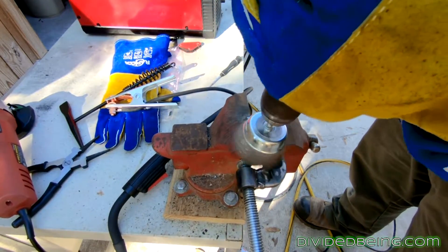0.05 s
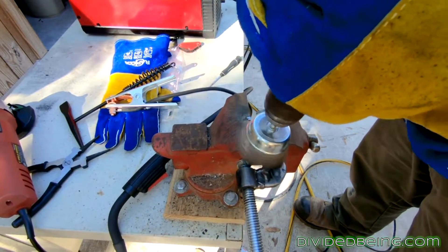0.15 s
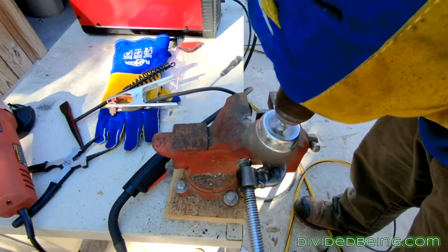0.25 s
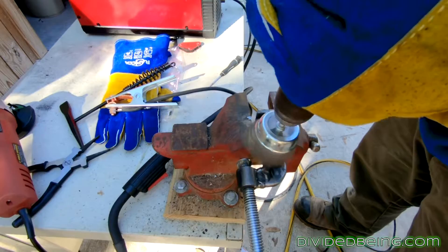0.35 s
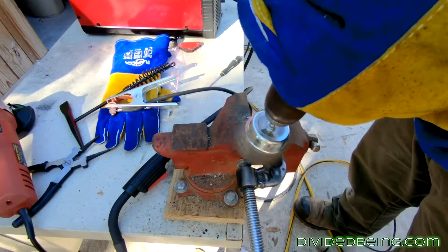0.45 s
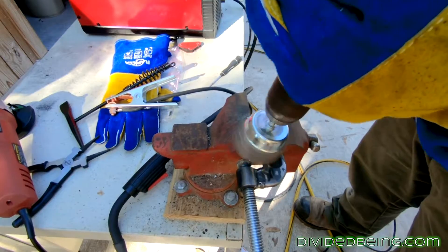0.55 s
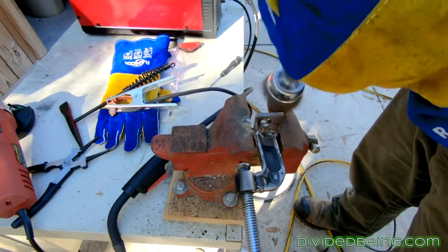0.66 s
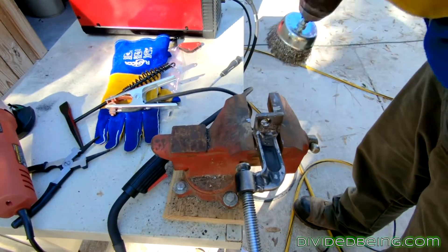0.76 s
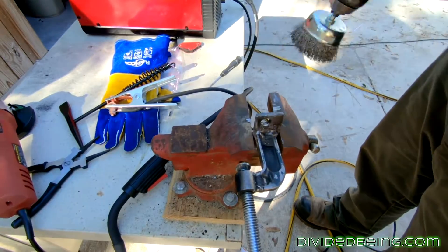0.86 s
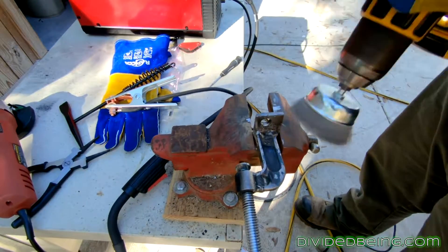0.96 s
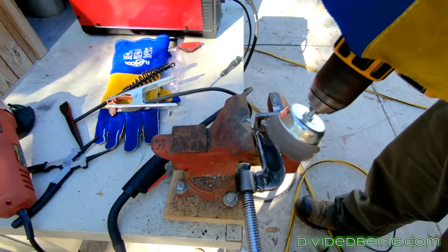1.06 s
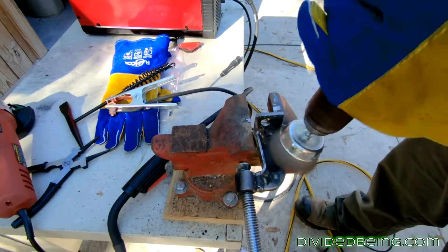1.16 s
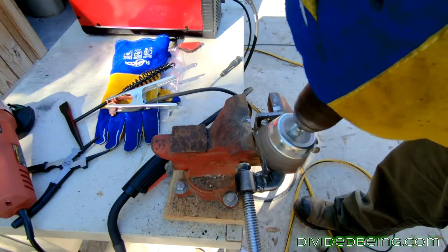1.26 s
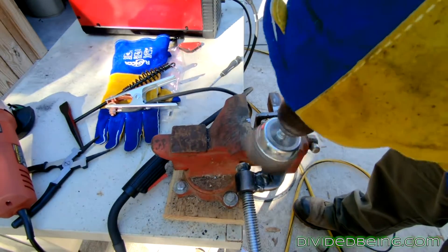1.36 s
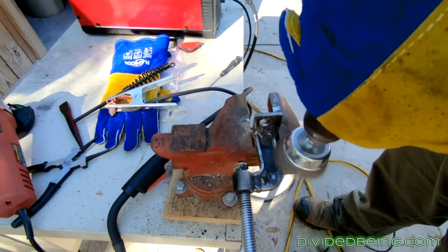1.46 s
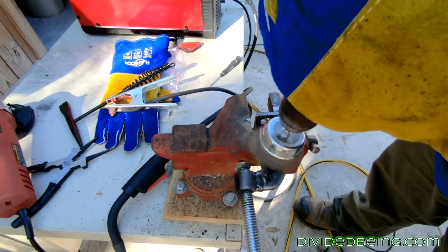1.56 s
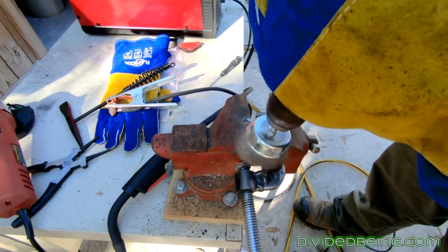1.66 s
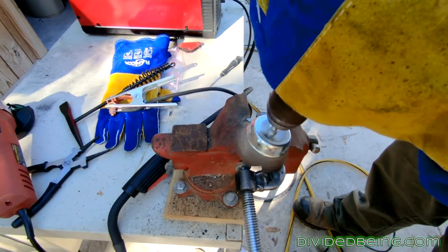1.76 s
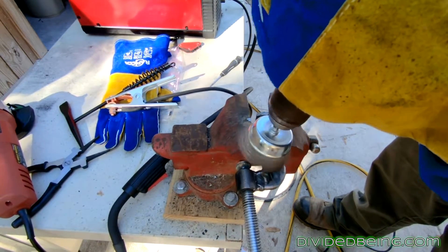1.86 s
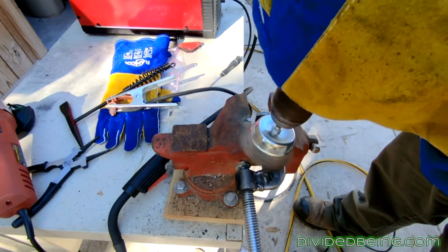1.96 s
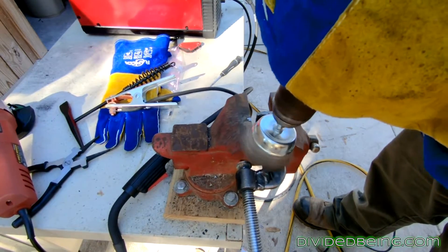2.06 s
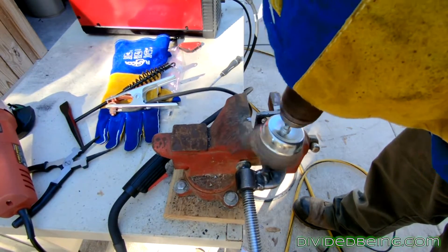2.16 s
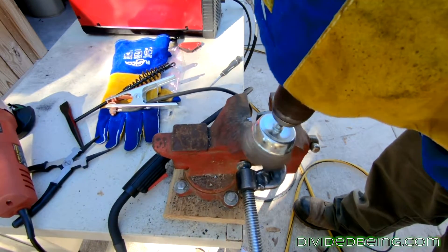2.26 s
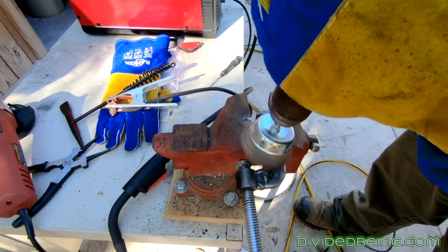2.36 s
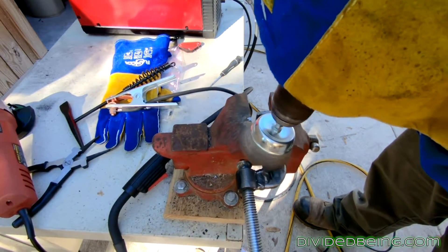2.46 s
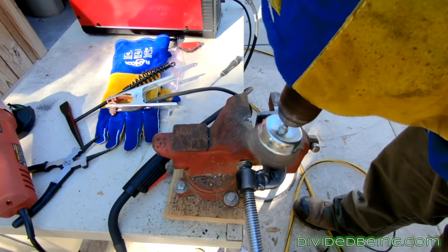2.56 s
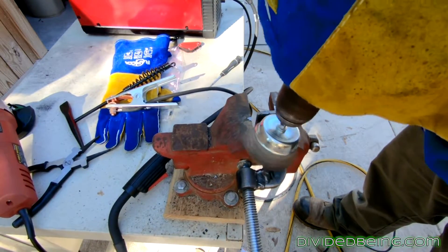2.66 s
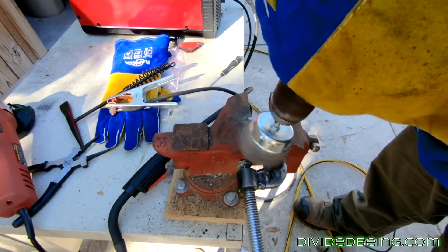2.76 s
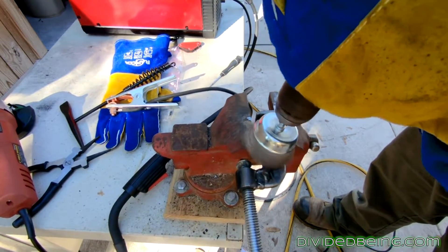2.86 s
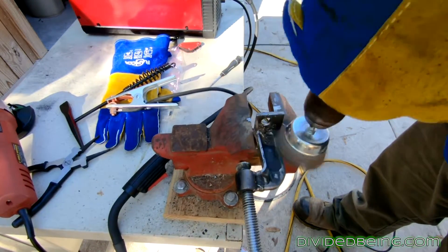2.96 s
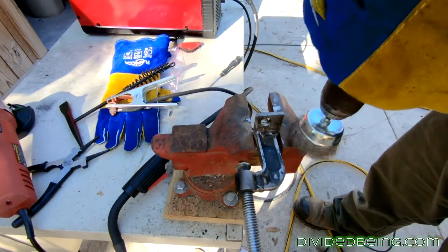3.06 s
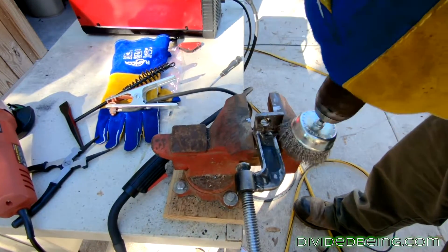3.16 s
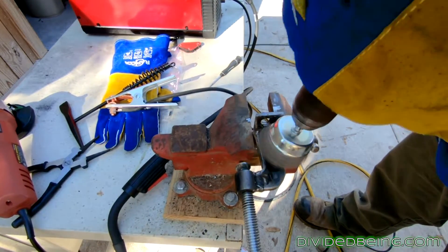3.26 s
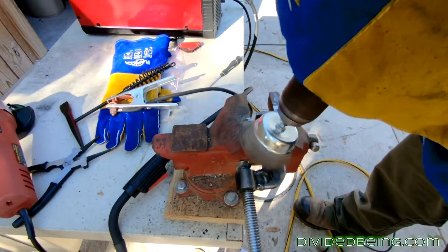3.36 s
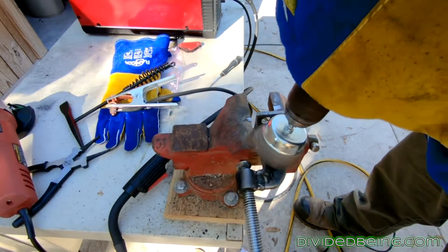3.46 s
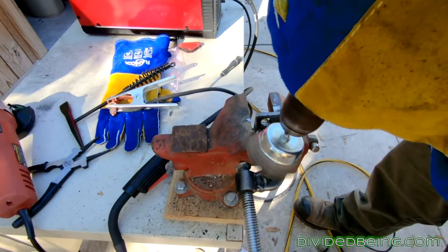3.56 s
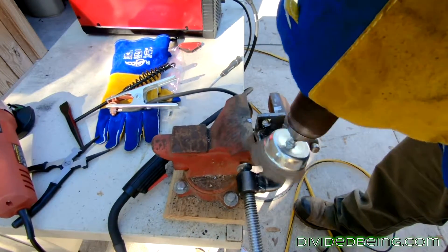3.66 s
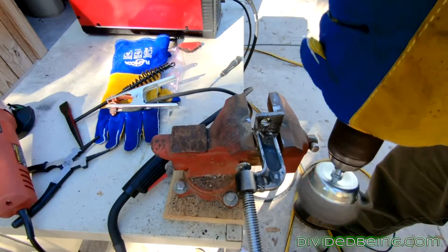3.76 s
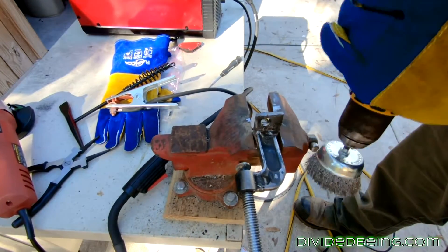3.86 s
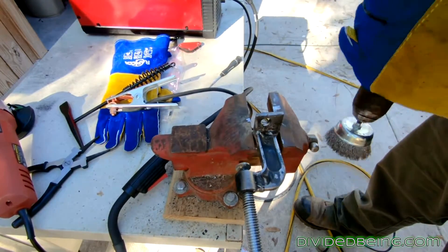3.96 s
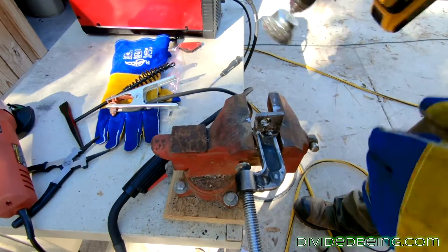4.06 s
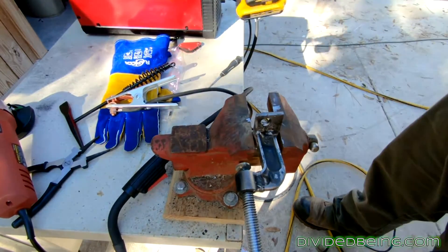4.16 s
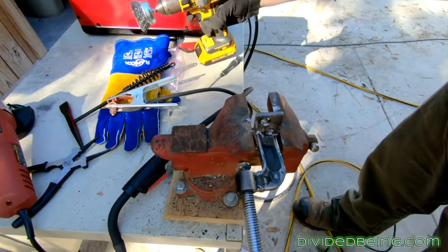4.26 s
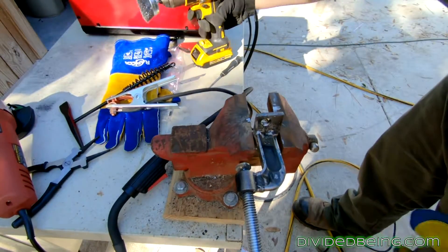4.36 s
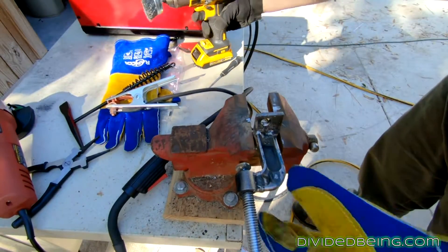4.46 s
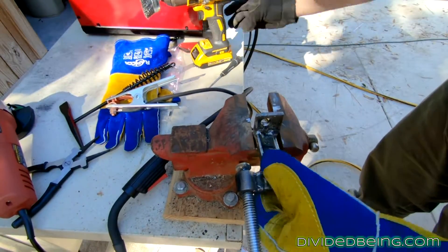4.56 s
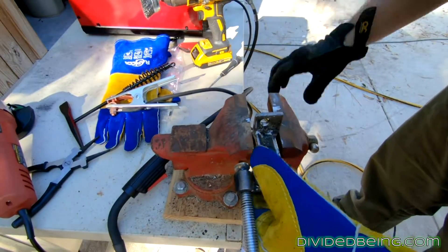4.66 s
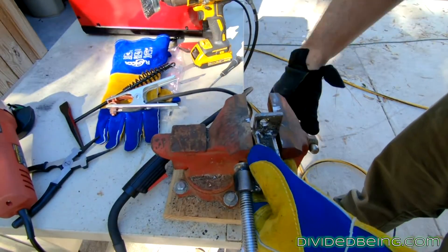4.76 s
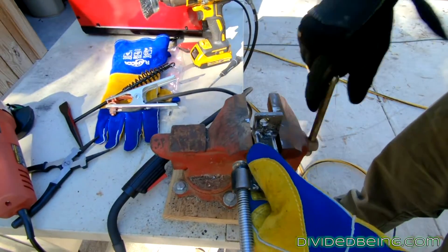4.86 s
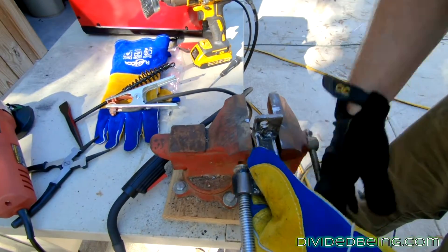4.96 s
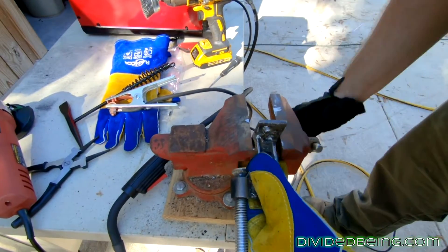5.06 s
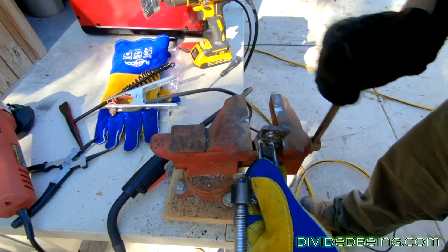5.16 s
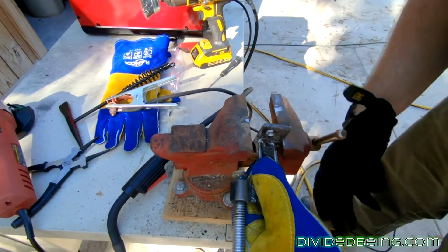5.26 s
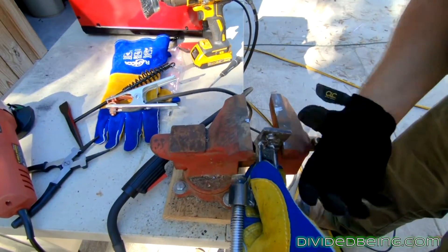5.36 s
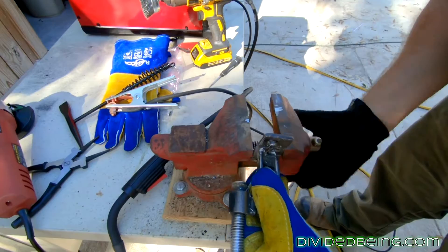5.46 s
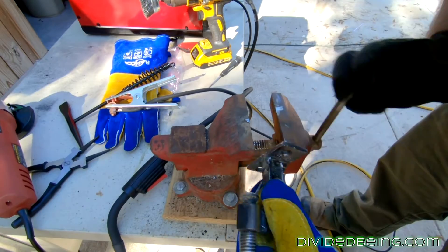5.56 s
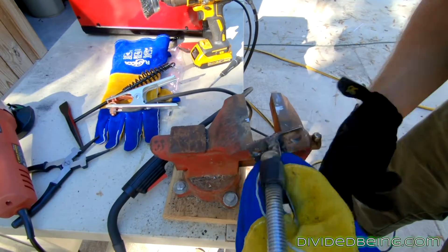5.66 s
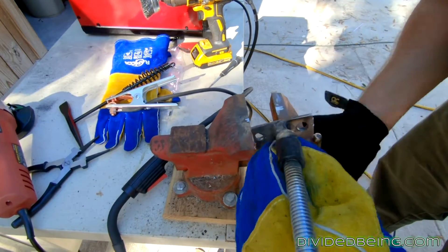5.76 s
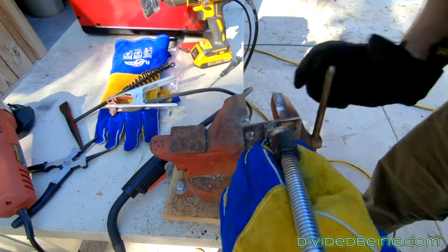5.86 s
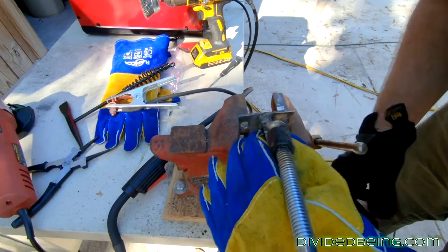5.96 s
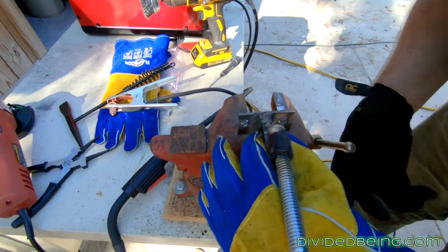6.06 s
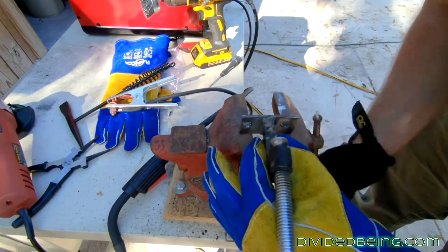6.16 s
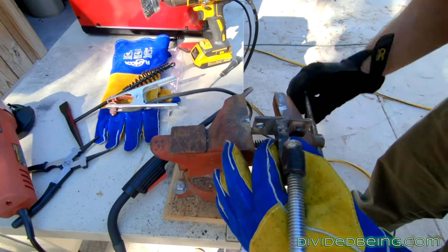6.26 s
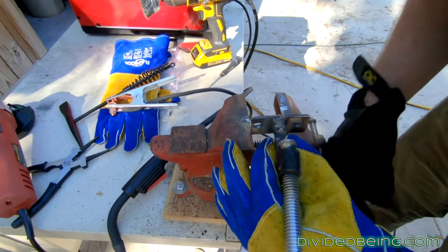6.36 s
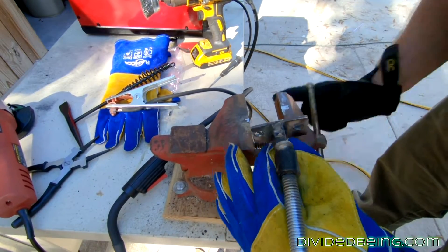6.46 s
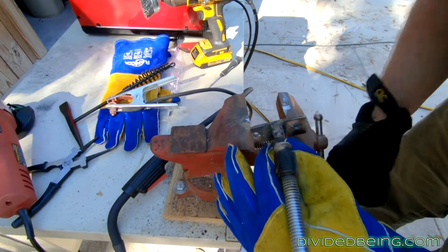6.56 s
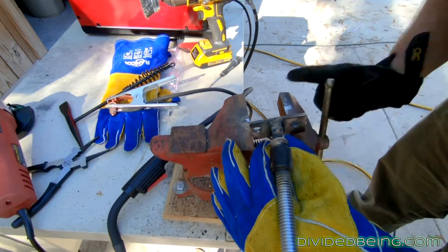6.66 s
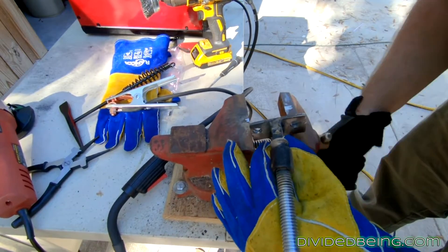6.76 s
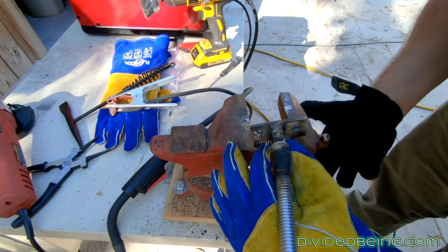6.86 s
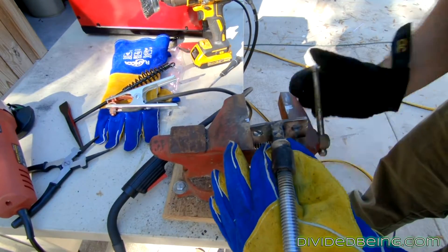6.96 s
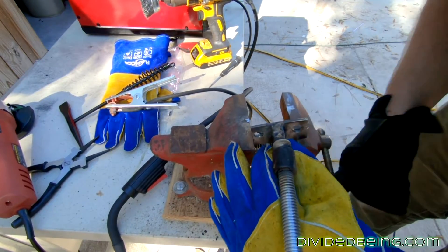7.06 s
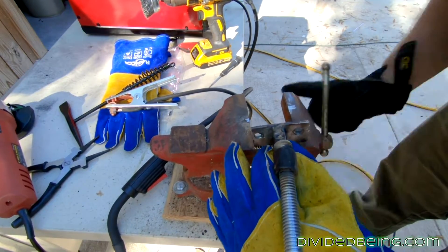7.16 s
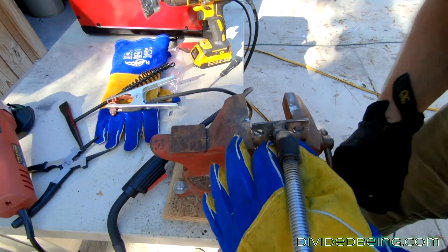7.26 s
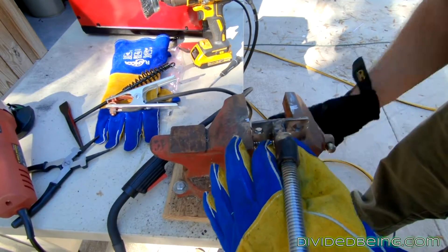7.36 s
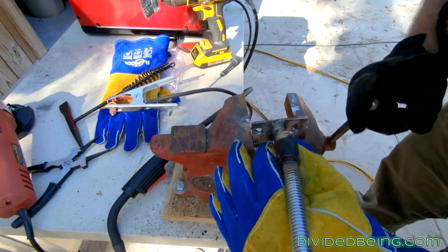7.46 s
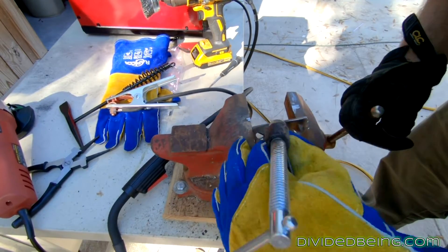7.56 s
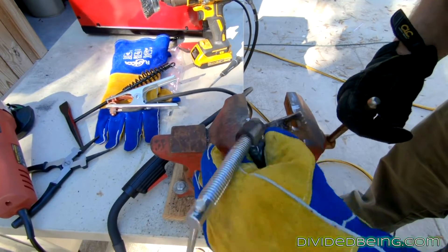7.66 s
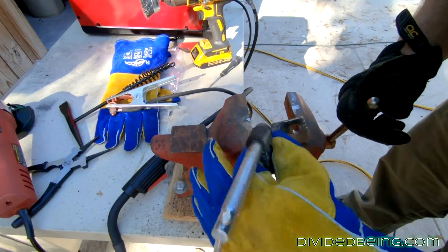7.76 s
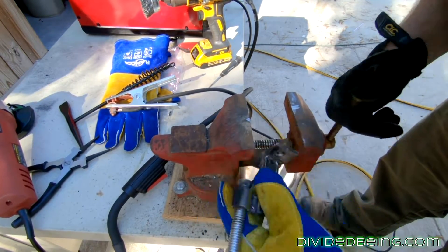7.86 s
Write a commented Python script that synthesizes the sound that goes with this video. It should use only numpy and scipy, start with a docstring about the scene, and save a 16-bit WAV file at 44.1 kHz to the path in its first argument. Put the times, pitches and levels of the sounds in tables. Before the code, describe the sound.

A whining cordless drill scours steel with a wire brush, hissing and rasping in a fast pulse and stopping briefly twice. After the third run it clacks to a halt and knocks down onto a workbench. The second half is quieter handling: a vise handle swings, the screw winds and a metal bracket shifts, with clunks, ticks, short squeaks and glove rustle. Everything is heard close in a small, open workshop.

```python
"""A small, open workshop, heard close. A cordless drill spins a wire cup brush against a steel bracket
in a bench vise: three runs, each ending in brake clacks. The motor whines and sags under load; the
lopsided brush bites twice a turn, sizzling, squealing and shaking the bench. The drill is put down.
Gloved hands swing the vise handle, shift the bracket and wind the screw, with knocks and squeaks.
Faint outdoor air and a low hum lie underneath."""
import sys
import numpy as np
from scipy import signal
from scipy.fft import rfft, irfft, next_fast_len
from scipy.io import wavfile
from scipy.ndimage import map_coordinates

SR = 44100
rng = np.random.default_rng(int(sys.argv[2]) if len(sys.argv) > 2 else 0)


def generate_wav(signal):
    """Clip the signal to [-1, 1] and save it as 16-bit WAV at the path in sys.argv[1]."""
    frames = np.transpose(np.atleast_2d(signal))
    scaled = np.clip(frames, -1, 1) * 32767
    pcm = np.round(scaled).astype(np.int16)
    wavfile.write(sys.argv[1], SR, pcm)


N = 348831
TIME_S = np.arange(N) / SR


def amp(db):
    """Decibels to gain."""
    return 10 ** (np.asarray(db) / 20)


def unit(x):
    """Scale to rms 1."""
    return x / np.sqrt(np.mean(x ** 2) + 1e-20)


def along(points, hz):
    """Interpolate (Hz, value) points on a log axis."""
    f, v = np.transpose(points)
    return np.interp(np.log(hz + 1), np.log(f + 1), v)


def curve(points):
    """Interpolate (s, value) points at every sample."""
    return np.interp(TIME_S, *np.transpose(points))


def ramp(since_s, rise_s):
    """Linear rise from 0 to 1."""
    return np.clip(since_s / rise_s, 0, 1)


def swell(s, length_s):
    """Bell curve around s, near half height at the ends of its length."""
    out = np.zeros(N)
    near = np.arange(max(int((s - 2 * length_s) * SR), 0), min(int((s + 2 * length_s) * SR), N))
    out[near] = np.exp(-np.pi * ((near / SR - s) / length_s) ** 2)
    return out


def swells(rows):
    """Summed gain of (s, length s, dB) swells."""
    return sum(amp(db) * swell(s, length_s) for s, length_s, db in rows)


def wobble(rate_hz):
    """Smooth random curve with knots at rate_hz."""
    knots = rng.standard_normal(int(N * rate_hz / SR) + 4)
    return map_coordinates(knots, [np.arange(N) * rate_hz / SR])


def grains(per_s, spread_db):
    """Tiny random impacts of uneven size."""
    return (rng.random(N) < per_s / SR) * rng.standard_normal(N) * amp(spread_db * rng.standard_normal(N))


def filtered(x, response):
    """Apply a frequency response."""
    n = x.shape[-1]
    m = next_fast_len(n + SR // 4)
    return irfft(rfft(x, m) * response(np.fft.rfftfreq(m, 1 / SR)), m)[..., :n]


def colour(x, spectrum):
    """Shape by (Hz, dB) points; rms 1."""
    return unit(filtered(x, lambda hz: amp(along(spectrum, hz))))


def resonate(x, hz, width_hz):
    """One steep resonance; rms 1."""
    return unit(filtered(x, lambda f: (1j * f * width_hz / (hz ** 2 - f * f + 1j * f * width_hz)) ** 2))


def burst(spectrum, t60_s, rise_s):
    """Decaying coloured noise; rms 1 over the first 20 ms."""
    t = np.arange(SR // 2) / SR
    x = colour(rng.standard_normal(len(t)), spectrum) * amp(-60 * t / t60_s) * (1 - np.exp(-t / rise_s))
    return x / np.std(x[:SR // 50])


def note(hz, t60_s, rise_s):
    """Damped sine; envelope peak 1."""
    t = np.arange(SR // 2) / SR
    shape = amp(-60 * t / t60_s) * (1 - np.exp(-t / rise_s)) ** 2
    return shape / shape.max() * np.sin(2 * np.pi * hz * t)


def modes(table, t):
    """Decaying partials; level and pitch vary per strike."""
    return sum(amp(db + 2 * rng.normal() - 60 * t / t60_s)
               * np.sin(2 * np.pi * (hz * rng.normal(1, 1 / 45) * t + rng.random()))
               for hz, db, t60_s in table)


def orders(phase, table, flutter_db):
    """Fluttering sines on multiples of a phase."""
    return sum(amp(db + flutter_db * wobble(35.08)) * np.sin(k * phase) for k, db in table)


def rasp(phase, width_hz):
    """Rough tone: narrow noise riding on a phase."""
    return unit(wobble(width_hz) * np.cos(phase) + wobble(width_hz) * np.sin(phase))


def slip(hz, width_hz, fade_s):
    """Friction in one resonance, loudest 0.1 s in."""
    t = np.arange(-SR // 10, SR // 10) / SR
    return resonate(rng.standard_normal(len(t)), hz, width_hz) / np.cosh(t / fade_s)


def add(track, s, sound):
    """Mix a sound in at s seconds."""
    part = track[max(round(s * SR), 0):][:len(sound)]
    part += sound[:len(part)]


# Each row: frequency in Hz, level in dB.
AIR_SPECTRUM = [(15, -53), (25, -47), (109, -15), (125, -25), (135, -11), (231, -58.5), (383, -1.5),
                (1150, -22.5), (2130, -18), (2300, -22), (3930, -21), (4380, -22.5), (15000, -35)]
HUM_TONES = [(113.0, -72.5), (166.9, -71)]
# Each row: time in seconds, hum gain in dB.
HUM_SWELL = [(0, -5.5), (4, -1.5), (6.6, 9), (7.2, -4), (7.91, -17)]


def background():
    """Faint outdoor air and a low hum that swells, then fades."""
    swell_db = curve(HUM_SWELL)
    hum = sum(amp(db + swell_db + wobble(3.13)) * np.sin(2 * np.pi * hz * TIME_S) for hz, db in HUM_TONES)
    return hum + amp(-60.5) * colour(rng.standard_normal(N), AIR_SPECTRUM)


# Each row: trigger on, trigger off, spin-up time, brush lands, brush lifts, all in seconds.
RUNS = [(-.3, .712, .035, -.2, .65), (.903, 3.042, .035, 1.15, 2.97), (3.166, 3.772, .051, 3.32, 3.68)]
# One list per run. Each row: time in seconds, whine under load in Hz.
RUN_SPEEDS = [
    [(0, 862), (.61, 879), (.655, 942), (.71, 930)],
    [(.9, 1000), (1.29, 1002), (1.37, 973), (1.42, 932), (1.5, 1000), (1.6, 976), (1.76, 932), (1.95, 919),
     (2.15, 929), (2.85, 907), (2.98, 882), (3.06, 825)],
    [(3.17, 970), (3.32, 964), (3.51, 910), (3.584, 814), (3.694, 847), (3.78, 774)],
]
# Each row: a run's gear, wire and bracket levels in dB, brush drift in dB per second, throb level in dB,
# limp relative to the throb in dB, added bite depth at full grip.
RUN_MIX = [(-32, -27.5, -29.5, -1, -37, -25, 0.073), (-29.5, -28, -30, 0, -33, -8, .12),
           (-28, -27.5, -37.5, -15, -38, -0.5, 0.17)]
FREE_HZ, GRIP_SAG_HZ = 1006.5, 65  # unloaded whine; sag at which the wires mostly grip
ROCK_RATE_HZ, ROCK_DEPTH_HZ, ROCK_CREST_S = 7.9, 13, .074  # brush rocks in the first run


def drill():
    """The motor sags under load and turns a lopsided brush that bites the steel twice a turn."""
    t = TIME_S
    runs = np.array(RUNS)
    run = np.maximum(np.searchsorted(runs[:, 0], t) - 1, 0)
    on_s, off_s, spin_up_s, lands_s, lifts_s = runs[run].T
    gear_db, wire_db, bracket_db, drift_db_per_s, throb_db, limp_db, depth = np.array(RUN_MIX)[run].T
    power = ramp(t - on_s, rise_s=.004) * np.exp(-np.maximum(t - off_s, 0) / .014)
    lifted = ramp(t - lifts_s, rise_s=.022)
    rocking = (run == 0) * (1 - lifted) * np.cos(2 * np.pi * ROCK_RATE_HZ * (t - ROCK_CREST_S))
    loaded_hz = curve(np.vstack(RUN_SPEEDS)) + ROCK_DEPTH_HZ * rocking
    whine_hz = loaded_hz * np.tanh(np.abs(t - on_s) / spin_up_s)
    sag_hz = np.maximum(FREE_HZ - loaded_hz, 0)
    grip = ramp(t - lands_s, rise_s=.014) * (1 - lifted) * np.tanh(sag_hz / GRIP_SAG_HZ) ** 2
    drawn_away = amp(-1.5 * lifted)
    whirl = drawn_away * (whine_hz / FREE_HZ + 1e-6) ** .63 * amp(.5 * wobble(13))  # unsteady hand
    brush_gain = whirl * amp(drift_db_per_s * np.maximum(t - lands_s, 0))
    jitter = 1 + .00422 * (1 + .5 * grip) * wobble(35)
    motor_rad = 2 * np.pi * np.cumsum(whine_hz * power ** .3 * jitter) / SR  # brake drags the pitch down
    chuck_rad = motor_rad / 24.4
    lobes = np.cos(2 * chuck_rad + .5 * wobble(25)) + .25 * np.cos(chuck_rad)
    bite = unit(np.exp((.15 + depth * grip) * lobes + .04 * wobble(120)))

    out = drawn_away * motor_whine(motor_rad, whine_hz, grip)
    out += whirl * amp(gear_db) * gear_rattle(chuck_rad, grip)
    out += brush_gain * amp(wire_db) * wire_sizzle(loaded_hz, grip, bite)
    out += brush_gain * amp(bracket_db) * bracket_hiss(grip, bite)
    out += edge_squeals(bite)
    out += brush_gain * grip * bite * wire_flicks()
    scrape, jolt = snags(bite)
    out += scrape + grip * amp(throb_db) * bench_throb(chuck_rad, limp_db)
    out += vise_shudder(whirl, grip, bite, jolt)
    return power * out


# Each row: multiple of the whine, level in dB.
WHINE_ORDERS = [(0.428, -24), (1, -0.5), (2.001, -40)]
BUZZ_ORDERS = [(.082, -31), (.164, -31), (.246, -25.5), (.328, -27), (.812, -23.5), (.918, -27),
               (1.082, -25), (1.164, -19), (1.246, -27), (1.328, -22.5), (1.41, -24), (1.492, -26),
               (1.574, -24), (2.082, -24)]
# Each row: whine in Hz, gain in dB.
WHINE_BY_SPEED = [(300, -45), (780, -26.5), (870, -27.3), (920, -25.3), (1000, -20.7)]


def motor_whine(motor_rad, whine_hz, grip):
    """Motor tones with gear sidebands that weaken under load."""
    buzz = amp(-2.5 - 11 * grip) * orders(motor_rad, BUZZ_ORDERS, flutter_db=3)
    shrill = amp(-14) * rasp(8 * motor_rad, width_hz=100)
    tones = orders(motor_rad, WHINE_ORDERS, flutter_db=1.5)
    return amp(along(WHINE_BY_SPEED, whine_hz)) * (tones + buzz + shrill)


# Each row: frequency in Hz, level in dB.
GEAR_SPECTRUM = [(40, -22), (100, -31), (450, -3), (700, -10), (1050, -3), (1400, 0.5), (2300, -5),
                 (3000, -5), (3700, -14.5), (4800, -22.5), (6250, -2), (8200, -18.5), (11000, -15),
                 (15000, -27)]


def gear_rattle(chuck_rad, grip):
    """The gears rattle, louder under load."""
    strain = amp(4 * grip + .5 * wobble(30.46))
    impacts = grains(7000, spread_db=.5) * (1 + .24 * np.cos(2 * chuck_rad))
    return strain * colour(impacts, GEAR_SPECTRUM)


# Each row: frequency in Hz at a 900 Hz whine, level in dB.
WIRE_SPECTRUM = [(2000, -34), (4600, -18.5), (5700, -2.5), (6600, 5.5), (7400, 4), (8400, -4.5),
                 (9200, -4.5), (10200, -3), (12000, -11.5), (13700, -9), (15000, -15.5)]


def wire_sizzle(loaded_hz, grip, bite):
    """Wires scratch the steel; their spectrum glides with speed."""
    scratch = colour(grains(7000, spread_db=-1), WIRE_SPECTRUM)
    pitch_ratio = (loaded_hz / 900) ** .6
    gliding = map_coordinates(scratch, [np.cumsum(pitch_ratio)], order=5, mode="wrap")
    return amp(4.5 * grip) * bite * gliding


# Each row: frequency in Hz, level in dB.
BRACKET_SPECTRUM = [(2600, -34), (3400, -1.5), (4100, -1), (4700, -3), (5400, -1.5), (6500, -21.5)]


def bracket_hiss(grip, bite):
    """The bracket hisses under the wires, less as they grip."""
    return amp(-2 * grip) * colour(grains(5000, spread_db=-1.5) * bite, BRACKET_SPECTRUM)


# Each row: peak time in seconds, length in seconds, pitch in Hz, level in dB.
SQUEALS = [(0.204, 1, 3240, -33), (0.578, 0.11, 3350, -32), (.3, 1, 3720, -43), (.3, 1, 9950, -43),
           (0.976, 0.08, 3440, -31), (1.16, 0.28, 3650, -35.5), (1.317, 0.055, 3900, -28.5),
           (1.393, 0.084, 3480, -30), (1.63, 0.5, 3730, -39.5), (2.1, .3, 4910, -42),
           (2.68, 0.092, 4700, -38.5), (2.6, 1, 3850, -43), (3.45, 0.65, 10550, -47)]


def edge_squeals(bite):
    """Wires squeal on the bracket's edge at each bite."""
    out = np.zeros(N)
    for s, length_s, hz, db in SQUEALS:
        phase = 2 * np.pi * hz * TIME_S
        tone = rasp(phase, width_hz=240) + amp(-1) * rasp(phase, width_hz=700)
        out += amp(db) * swell(s, length_s) * tone
    return bite ** 2 * out


# Each row: frequency in Hz, width in Hz, level in dB.
WIRE_MODES = [(1510, 180, -6), (3720, 300, -3.5), (4960, 300, -10), (6790, 260, -1), (7280, 360, -7),
              (9250, 340, -4)]


def wire_flicks():
    """Single wires snap off the edge, each ringing in one resonance."""
    rings = sum(amp(db) * resonate(grains(170, spread_db=3), hz, width) for hz, width, db in WIRE_MODES)
    return amp(-35) * unit(rings)


# Each row: multiple of the chuck speed, level in dB.
THROB_ORDERS = [(2, -1.5), (4, -4), (6, -12.5), (8, -13)]


def bench_throb(chuck_rad, limp_db):
    """The two uneven bites per turn shake the bench."""
    limp = amp(limp_db) * np.sin(3 * chuck_rad)
    return amp(2.4 * wobble(9.2)) * (orders(chuck_rad, THROB_ORDERS, flutter_db=3) + limp)


# Each row: frequency in Hz, level in dB.
SHUDDER_SPECTRUM = [(25, -15), (60, -19), (110, -2.5), (210, 1.5), (300, -4), (440, 5), (540, 1.5),
                    (680, -6.5), (860, 0.5), (1200, -17), (2500, -49.5)]


def vise_shudder(whirl, grip, bite, jolt):
    """The vise shakes faintly at idle, more under grip and in snags."""
    steady = amp(-53) * whirl + grip * amp(-35 + wobble(25))
    return np.hypot(steady, jolt) * colour(grains(1500, spread_db=-.5) * bite, SHUDDER_SPECTRUM)


# Each row: peak time in seconds, length in seconds, jolt level in dB, scrape level in dB.
SNAGS = [(0.643, 0.048, -19.5, -45), (1.23, 0.11, -46, -31), (1.424, 0.11, -32.5, -57),
         (2.646, 0.067, -28.5, -26.5), (2.947, 0.13, -24, -37), (3.429, 0.073, -22, -42),
         (3.638, 0.19, -23.5, -43)]
# Each row: frequency in Hz, level in dB.
SCRAPE_SPECTRUM = [(600, -15), (1300, 0), (1800, -0.5), (2600, -11), (5000, -25), (9000, -28)]


def snags(bite):
    """The brush catches an edge. Returns the scrape and the envelope of the jolt."""
    jolt = swells((s, length_s, db) for s, length_s, db, _ in SNAGS)
    caught = swells((s, length_s, db) for s, length_s, _, db in SNAGS)
    return caught * colour(grains(2500, spread_db=0) * bite, SCRAPE_SPECTRUM), jolt


# Each row: start in seconds, then ring, smack, thud and contact levels in dB.
KNOCKS = [(0.632, -23, -16, -29, -38), (1.384, -16.5, -21, -35, -41), (2.936, -18, -17, -26, -44),
          (2.957, -14.5, -15, -26, -44), (3.408, -13, -11, -31, -46), (3.544, -11.5, -14.5, -38, -47),
          (3.597, -9.5, -11, -23, -38), (3.624, -14, -8, -26, -40), (3.656, -11, -9.5, -29, -49),
          (4.295, -12, -6, -27, -23), (4.307, -20, -11, -18, -40), (4.322, -13, -12, -28, -47),
          (4.362, -11, -4, -27, -30), (4.386, -9, -20, -18, -27.5), (4.428, -13.5, -24, -40, -30.5),
          (4.549, -35, -37, -68, -43.5), (4.596, -27.5, -28.5, -71, -32), (4.828, -7.5, -10, -13, -21),
          (4.841, -5, -9.5, -15.5, -26), (4.851, -14, -13, -23, -33), (5.338, -14.5, -23, -30.5, -32.5),
          (5.525, -17, -14, -35, -42), (5.585, -26, -31, -29, -49), (5.666, -17, -27, -26, -43),
          (5.674, -18.5, -20, -30, -35), (5.86, -27, -35, -33.5, -48), (6.234, -26, -32, -40.5, -50),
          (6.423, -24.5, -28, -64, -51), (6.484, -21.5, -19.5, -63, -39.5),
          (6.797, -17.5, -25, -32.5, -39.5), (7.125, -25, -29, -70, -49), (7.269, -29, -39, -63, -55),
          (7.331, -24, -30, -72, -56), (7.524, -27, -36, -68, -46.5), (7.581, -17, -23, -46, -42.5),
          (7.733, -16, -27, -55, -36)]
# Each row: frequency in Hz, level in dB.
BENCH_SPECTRUM = [(30, -61), (70, -36), (130, -12), (260, -34.5), (380, 0.5), (540, 9), (660, -2.5),
                  (800, 7.5), (930, 5.5), (1050, -0.5), (1170, -1.5), (1500, -7.5), (2200, -22),
                  (5000, -46)]
THUD_SPECTRUM = [(25, -42), (50, -20), (75, -7), (150, -3), (240, 7.5), (450, 2), (900, -40.5)]
CONTACT_SPECTRUM = [(500, -26), (1600, 10), (2600, 6), (4000, 1), (6000, -0.5), (9000, -5.5), (15000, -19)]
# Each row: frequency in Hz, level in dB, T60 in seconds.
BENCH_MODES = [(112.2, -32, 0.18), (226, -9.5, 0.13), (334, -7, 0.15), (425, 8, 0.099), (480, 3, 0.2),
               (534, 3.5, 0.19), (897, 7, 0.16), (919, 2, 0.13), (1158, 6, 0.18), (1400, -3.5, 0.16),
               (1930, -8, 0.15)]
VISE_MODES = [(2150, 9, 0.46), (3880, 27.5, 0.064), (4230, 10, 0.54)]


def knocks():
    """Each blow makes hard contact, smacks, thuds and rings the bench top and the vise."""
    out, t = np.zeros(N), np.arange(SR // 2) / SR
    for s, ring_db, smack_db, thud_db, contact_db in KNOCKS:
        smack = amp(smack_db) * note(hz=868 * rng.normal(1, .034), t60_s=.015, rise_s=.0008)
        body = amp(ring_db - 12.5) * burst(BENCH_SPECTRUM, t60_s=.16, rise_s=.0016)
        ring = amp(ring_db - 23) * modes(BENCH_MODES, t) * (1 - np.exp(-t / .0018))
        thud = amp(thud_db - 9) * burst(THUD_SPECTRUM, t60_s=.12, rise_s=.0096)
        contact = amp(contact_db - 8.5) * burst(CONTACT_SPECTRUM, t60_s=.13, rise_s=.0032)
        crack = amp(contact_db - 7.5) * burst(CONTACT_SPECTRUM, t60_s=.041, rise_s=.0007)
        clink = amp(contact_db - 38) * modes(VISE_MODES, t)
        add(out, s, smack + body + ring + thud + contact + crack + clink)
    return out


# Each row: peak time in seconds, length in seconds, level in dB.
HANDLE_PUSHES = [(4.52, 0.081, -42), (4.808, 0.026, -37), (5.185, 0.079, -38), (5.31, 0.05, -41.5),
                 (5.485, 0.076, -36), (5.795, 0.044, -37.5), (6.0, .04, -43), (6.14, 0.1, -43),
                 (6.258, 0.072, -37), (6.595, 0.048, -34), (6.735, 0.045, -41), (7.115, 0.019, -43),
                 (7.39, .07, -50), (7.295, 0.073, -44), (7.555, 0.053, -39.5), (7.62, 0.025, -46),
                 (7.68, 0.048, -40), (7.8, 0.12, -37)]
GLOVE_RUSTLES = [(3.98, 0.052, -63.5), (4.145, 0.068, -48), (4.215, 0.074, -49.5), (4.48, 0.12, -54),
                 (5.0, 0.19, -47), (5.23, 0.17, -56), (5.52, 0.096, -52), (5.77, 0.15, -48.5),
                 (6.05, 0.038, -52), (6.23, 0.12, -57.5), (6.59, .14, -47.5), (7.46, 0.18, -52.5),
                 (7.68, 0.033, -60), (7.8, 0.16, -51)]
# Each row: frequency in Hz, level in dB.
SCREW_SPECTRUM = [(40, -56), (120, -13), (280, -12.5), (360, -1.5), (540, 3.5), (660, -7.5), (800, 4.5),
                  (930, 10), (1030, -10), (1170, 2.5), (1500, -7), (2200, -34), (5000, -51)]
THREAD_SPECTRUM = [(2500, -18), (5500, 3), (8000, 3.5), (15000, -6)]
CLOTH_SPECTRUM = [(400, -1.5), (1200, 13), (2400, 7), (4000, 9.5), (5200, 1), (7700, 3), (9500, -5),
                  (11500, 1.5), (13000, -10), (15000, -12)]
WINDING_START_S = 4.92


def rubbing():
    """Parts scuff at each blow, the screw rumbles through the bench, its thread whispers, gloves rustle."""
    winding = ramp(TIME_S - WINDING_START_S, rise_s=.055)
    scuffs = swells((s, .022, -21.5 + .7 * ring_db) for s, ring_db, *_ in KNOCKS)
    pushes = np.hypot(swells(HANDLE_PUSHES), scuffs)
    screw_gain = np.hypot(amp(-54) * winding, pushes) * amp(.76 * wobble(45))
    binding = winding * amp(3 * wobble(22))  # thread binds and slips
    thread = amp(-63.5) * binding * colour(grains(8800, spread_db=7), THREAD_SPECTRUM)
    glove_gain = np.hypot(amp(-72) * binding, swells(GLOVE_RUSTLES)) * amp(1.6 * wobble(45))
    screw = screw_gain * colour(grains(1100, spread_db=-1.5), SCREW_SPECTRUM)
    gloves = glove_gain * colour(grains(16000, spread_db=1), CLOTH_SPECTRUM)
    return screw + thread + gloves


# Each row: start in seconds, level in dB.
CLACKS = [(0.7131, -15), (0.725, -12), (0.735, -9), (0.9023, -23), (0.9075, -13), (3.042, -8.5),
          (3.0531, -8.5), (3.0642, -12), (3.1656, -18.5), (3.168, -17), (3.768, -12), (3.7812, -7),
          (3.792, -13)]
# Each row: frequency in Hz, level in dB.
CLACK_SPECTRUM = [(200, -8.5), (700, -1.5), (1400, 1.5), (2000, 7.5), (2900, 2), (4600, -9.5), (6500, -1.5),
                  (9000, -4.5), (15000, -21)]


def gear_clacks():
    """The gear train takes up its slack on starting and hammers its lock on braking."""
    out = np.zeros(N)
    for s, db in CLACKS:
        snap = amp(db - 17) * burst(CLACK_SPECTRUM, t60_s=.011, rise_s=.0008)
        tail = amp(db - 24.5) * burst(CLACK_SPECTRUM, t60_s=.029, rise_s=.002)
        add(out, s, snap + tail)
    return out


# Each row: peak time in seconds, level in dB.
SLIDES = [(4.285, -45), (4.3, -48), (4.437, -36.5), (4.829, -34.5), (5.339, -36), (5.668, -35),
          (6.788, -39.5)]


def slides():
    """Parts slide home with a short, wide scrape."""
    out = np.zeros(N)
    for s, db in SLIDES:
        add(out, s - .1, amp(db) * slip(hz=4670, width_hz=5900, fade_s=.0088))
    return out


# Each row: start in seconds, pitch in Hz, level in dB, T60 in seconds.
LANDINGS = [(4.318, 492, -14.5, .23), (4.385, 481, -23.5, .5)]


def drill_landing():
    """The drill lands on its edge, then flat, and chatters on the ringing bench top."""
    out, t = np.zeros(N), np.arange(SR) / SR
    for s, hz, db, t60_s in LANDINGS:
        chatter_db = 3 * wobble(44)[:SR]
        envelope = amp(db - 60 * t / t60_s + chatter_db) * ramp(t, rise_s=.0091)
        add(out, s, envelope * np.sin(2 * np.pi * hz * t + .5 * wobble(51)[:SR]))
    return out


# Each row: start in seconds, main note in Hz, level in dB.
CLUNKS = [(4.757, 410, -34.5), (4.974, 459, -27.5), (5.136, 896, -30), (5.454, 894, -28), (5.493, 857, -24),
          (5.754, 480, -31.5), (5.895, 533, -28.5), (5.96, 445, -32.5), (6.038, 467, -31), (6.07, 464, -31),
          (6.209, 423, -27.5), (6.314, 886, -28), (6.384, 1050, -27.5), (6.56, 520, -30),
          (6.599, 1126, -24.5), (6.653, 850, -26.5), (6.704, 1144, -32), (6.759, 520, -28),
          (6.906, 503, -29), (7.163, 850, -30), (7.656, 960, -32), (7.683, 1164, -29), (7.812, 1137, -25.5),
          (7.887, 475, -31)]


def clunks():
    """The loose handle and bracket settle, each time sounding mainly one bench note."""
    out = np.zeros(N)
    for s, hz, db in CLUNKS:
        tone = amp(db - 6.5) * note(hz, t60_s=.047, rise_s=.003)
        body = amp(db - 13.5) * burst(BENCH_SPECTRUM, t60_s=.12, rise_s=.003)
        add(out, s, tone + body)
    return out


# Each row: peak time in seconds, pitch in Hz, level in dB, rise and fall time in seconds.
SQUEAKS = [(4.805, 7700, -39, .003), (4.894, 14000, -36, 0.0051), (5.334, 10100, -30, 0.0032),
           (5.341, 14000, -30, 0.0069), (5.46, 1950, -45, 0.0072), (5.497, 1750, -41, .008),
           (5.532, 1860, -39.5, 0.01), (5.566, 7860, -33.5, 0.0051), (5.667, 14060, -23.5, 0.0059),
           (6.05, 5010, -55, .012), (6.34, 3800, -43, 0.01), (6.342, 7570, -53, 0.016),
           (6.787, 14000, -47, 0.0085), (7.731, 3600, -34, 0.0027), (7.777, 7800, -43, 0.0085),
           (7.814, 5870, -33, 0.0017)]


def handle_squeaks():
    """The handle rubs in its eye: a narrow squeak inside a wider scrape."""
    out = np.zeros(N)
    for s, hz, db, fade_s in SQUEAKS:
        squeak = slip(hz, width_hz=170, fade_s=fade_s)
        scrape = amp(-7) * slip(hz, width_hz=3000, fade_s=fade_s)
        add(out, s - .1, amp(db) * (squeak + scrape))
    return out


# Each row: start in seconds, level in dB.
TICKS = [(5.333, -32.5), (5.453, -53), (5.493, -52), (5.547, -51), (5.663, -34), (5.789, -51),
         (6.123, -55.5), (6.16, -56.5), (6.278, -56), (6.482, -35), (6.995, -57), (7.269, -57),
         (7.731, -41.5)]
# Each row: frequency in Hz, level in dB.
TICK_SPECTRUM = [(1500, -9), (4000, 5), (7500, 5.5), (15000, -5.5)]


def steel_ticks():
    """Steel taps steel in the handle and jaws."""
    out = np.zeros(N)
    for s, db in TICKS:
        add(out, s, amp(db) * burst(TICK_SPECTRUM, t60_s=.031, rise_s=.0005))
    return out


# Each row: frequency in Hz, T60 in seconds.
WALL_DECAY = [(100, 0.082), (600, 0.31), (2000, 0.053), (12000, 0.096)]


def room(x):
    """Short wall reflections, 5 ms late, each frequency dying at its own rate."""
    hz, t, noise = signal.stft(rng.standard_normal(SR // 2), SR, nperseg=256)
    tail = signal.istft(noise * amp(-60 * t / along(WALL_DECAY, hz)[:, None]), SR, nperseg=256)[1]
    return signal.fftconvolve(x, np.pad(tail, (SR // 200, 0)) / np.linalg.norm(tail))[:N]


def scene():
    """All sources centred, the close drill driest; scattered phases widen the sound above 8 kHz."""
    tool = drill()
    tool_echo = amp(-23) * room(tool)
    handling = gear_clacks() + knocks() + clunks() + drill_landing()
    handling += handle_squeaks() + slides() + steel_ticks() + rubbing()
    mid = tool + tool_echo + handling + amp(-12) * room(handling) + background()
    hz, _, bins = signal.stft(mid, SR, nperseg=128)
    scattered = bins * (hz > 8000)[:, None] * np.exp(2j * np.pi * rng.random(bins.shape))
    side = amp(-2.5) * signal.istft(scattered, SR, nperseg=128)[1][:N]
    return np.array([mid + side, mid - side])


def record(dry):
    """Soft peak limit, then a steep low-pass."""
    ceiling, cutoff_hz = .65, 15150
    limited = dry / (1 + np.abs(dry / ceiling) ** 6) ** (1 / 6)
    return filtered(limited, lambda hz: 1 / np.sqrt(1 + (hz / cutoff_hz) ** 300))


dry = scene()
out = record(dry)
generate_wav(out)
```